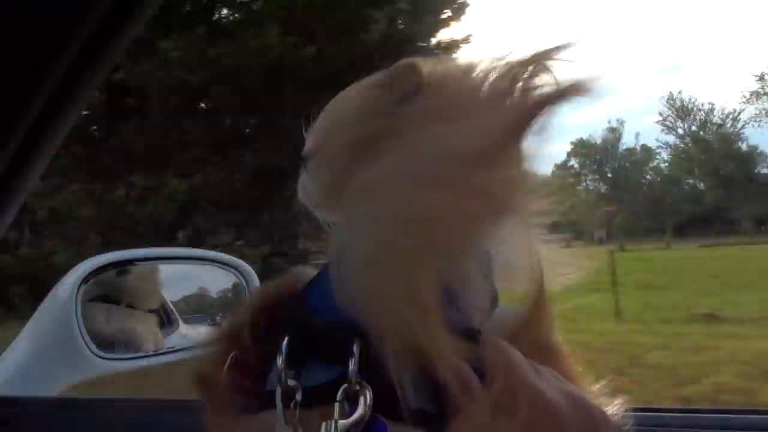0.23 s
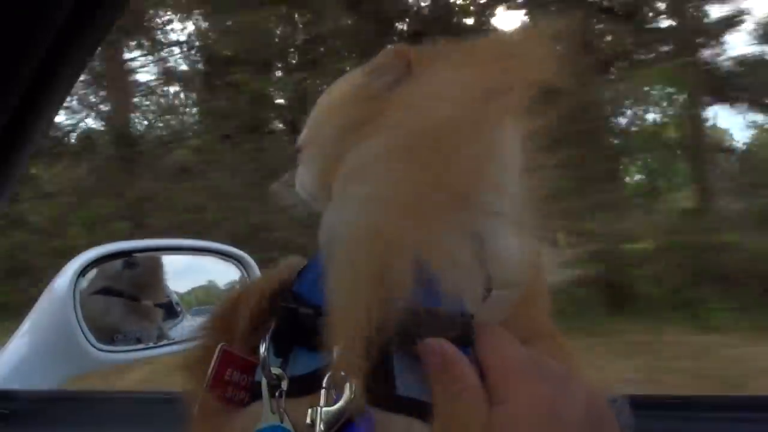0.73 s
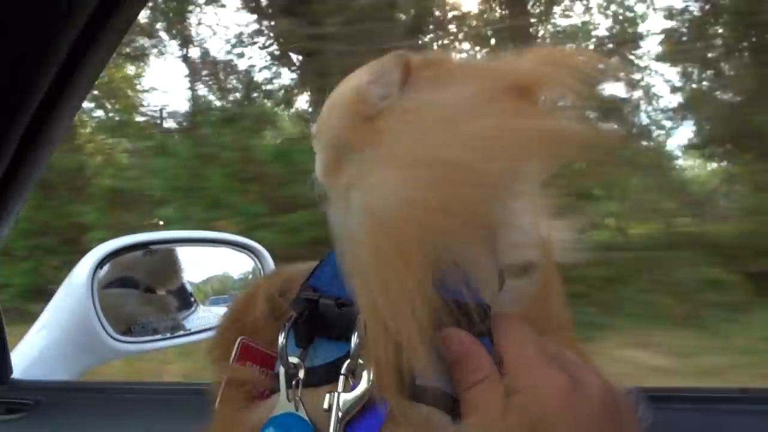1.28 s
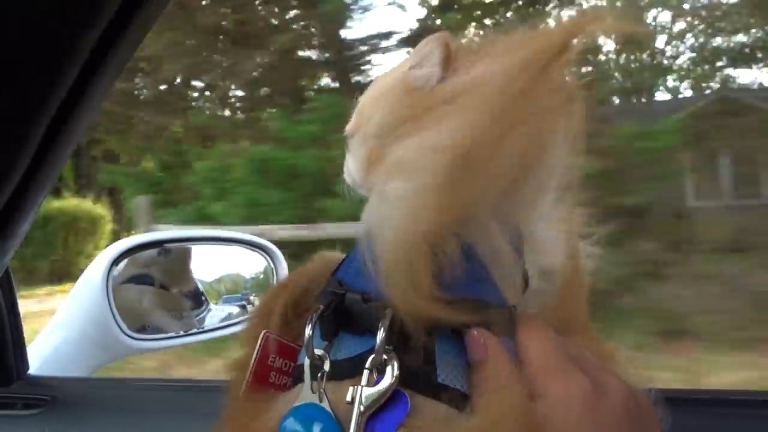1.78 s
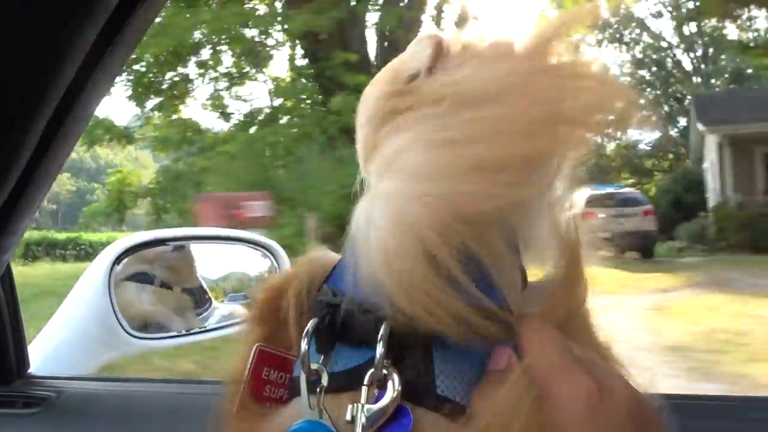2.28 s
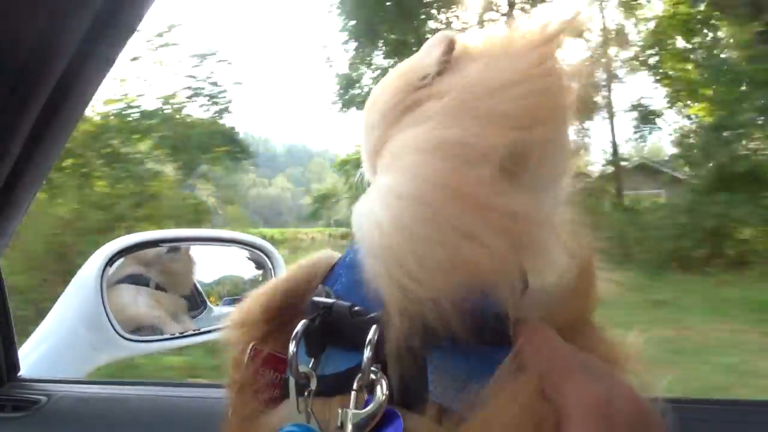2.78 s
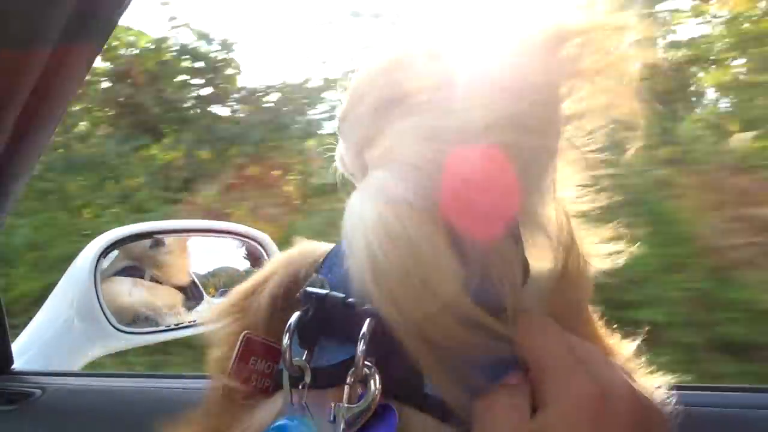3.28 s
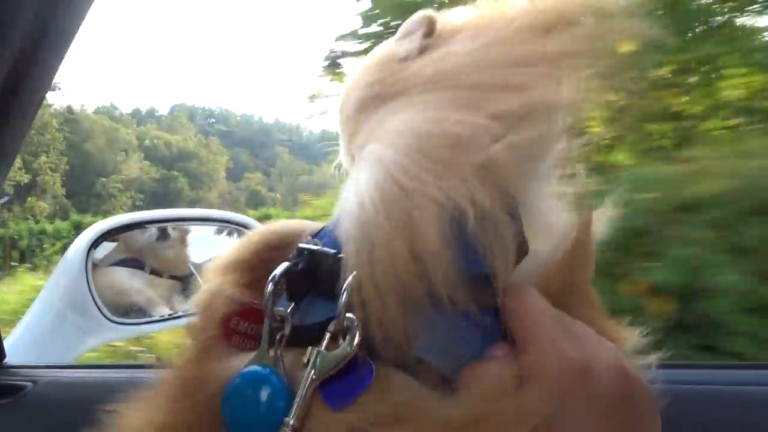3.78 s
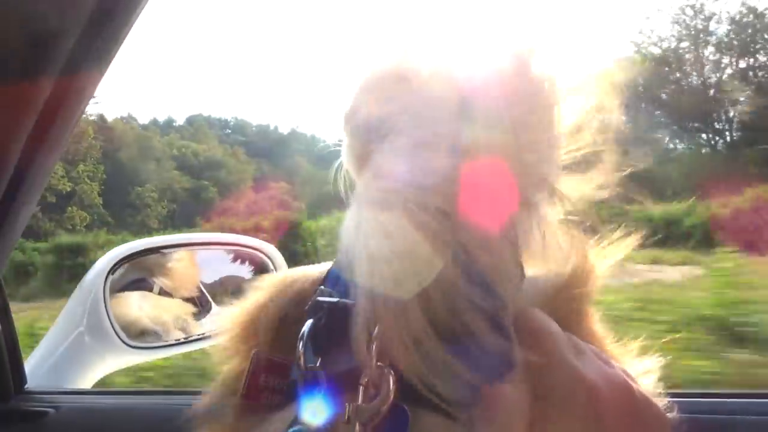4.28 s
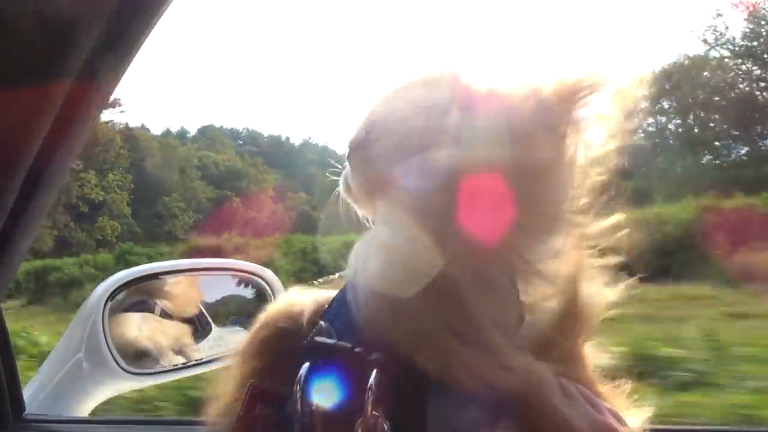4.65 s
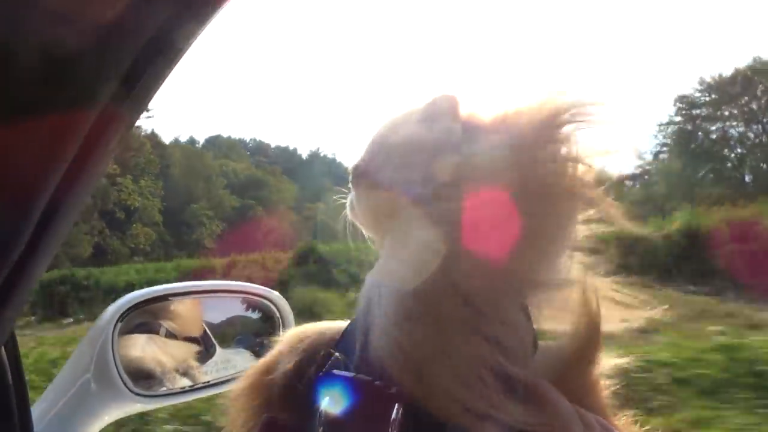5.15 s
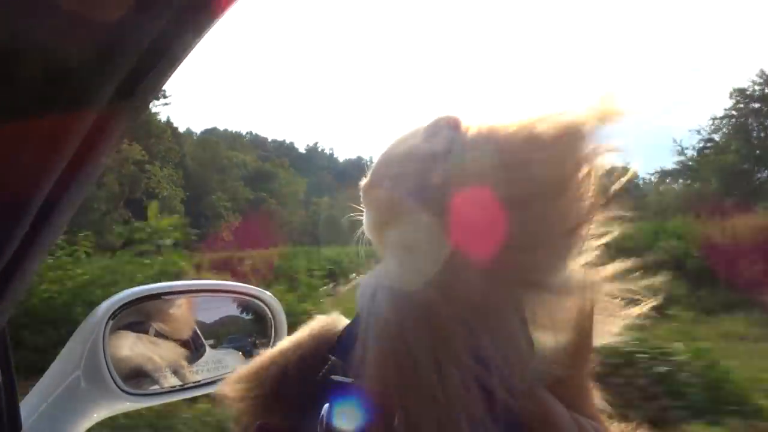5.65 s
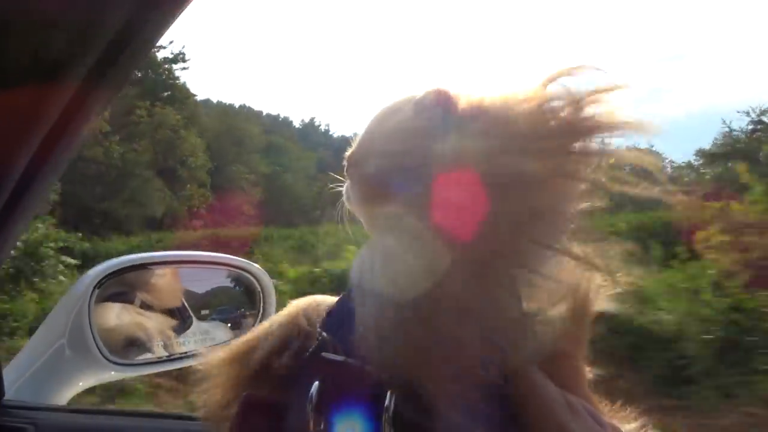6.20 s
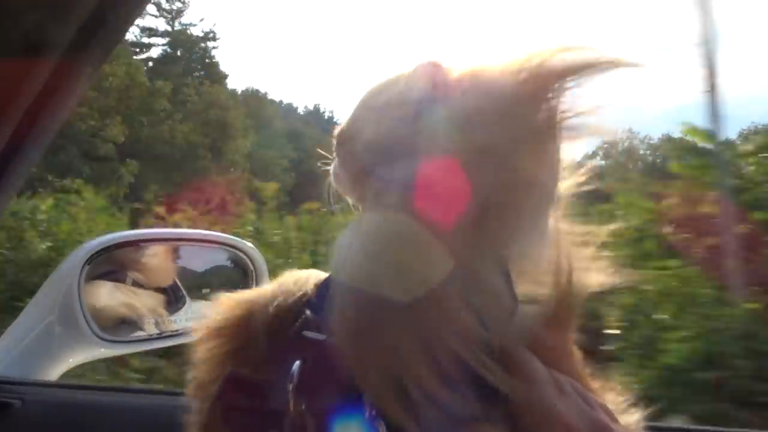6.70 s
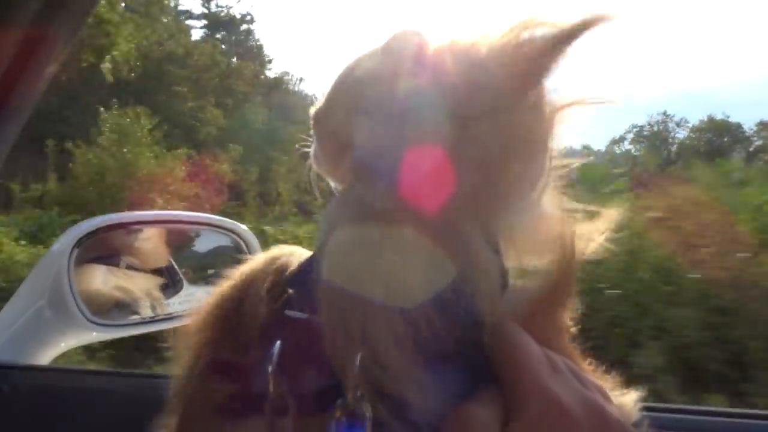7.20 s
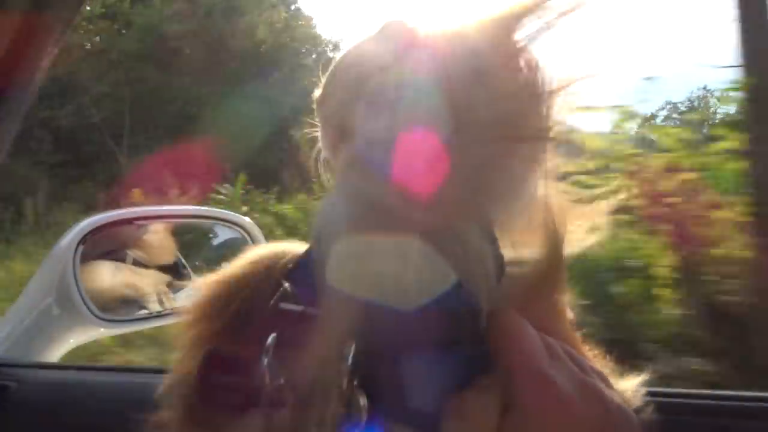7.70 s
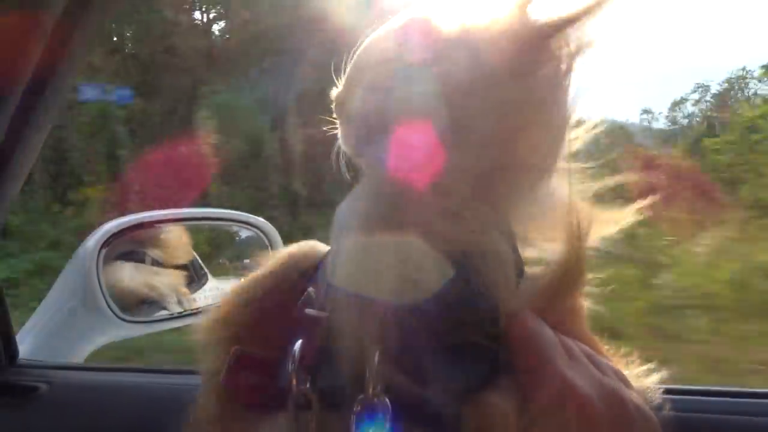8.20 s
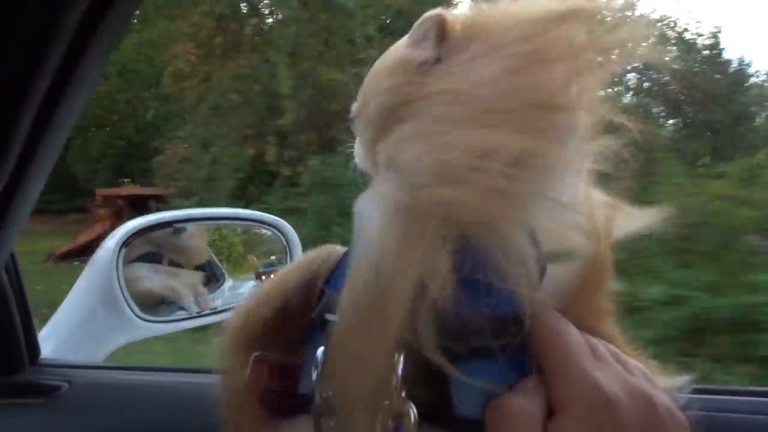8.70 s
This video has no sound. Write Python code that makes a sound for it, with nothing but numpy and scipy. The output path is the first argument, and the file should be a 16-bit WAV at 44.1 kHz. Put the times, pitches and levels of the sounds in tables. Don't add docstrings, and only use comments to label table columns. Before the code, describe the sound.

Close cabin sound beside a long-haired dog at an open car window: buzzing low exhaust, briefly strong, then coasting with soft coughs and dropouts, then firm and steady again, gently climbing. Low wind gusts buffet the left and right microphones, airy hiss swells midway, and strap flicks and small buckle clinks tick through the rough middle section.

```python
import sys
import numpy as np
from scipy import signal
from scipy.fft import rfft, irfft, next_fast_len
from scipy.io import wavfile
from scipy.ndimage import uniform_filter1d, map_coordinates

SR = 44100
rng = np.random.default_rng(int(sys.argv[2]) if len(sys.argv) > 2 else 0)


def store_wav(level_fs):
    pcm = np.round(np.clip(np.atleast_2d(level_fs), -1, 1) * 32767)
    wavfile.write(sys.argv[1], SR, pcm.T.astype(np.int16))


def voltage_ratio(decibels):
    exponent = np.asarray(decibels, float) / 20
    return 10 ** exponent


N = 394254
STEP = 32


def unit(x):
    return x / np.sqrt(np.mean(x ** 2) + 1e-20)


def along(points, hz, axis=1):
    columns = np.transpose(points)
    return np.interp(np.log(hz + 1), np.log(columns[0] + 1), columns[axis])


def curves(rows):
    s, *columns = np.transpose(rows)
    return [np.interp(np.arange(N) / SR, s, column) for column in columns]


def fine(x):
    return np.interp(np.arange(N) / STEP, np.arange(len(x)), x)


def wobble(rate):
    knots = rng.standard_normal(int(N * rate / SR) + 4)
    return fine(map_coordinates(knots, [np.arange(0, N + STEP, STEP) * rate / SR]))


def filtered(x, response):
    m = next_fast_len(N + 8192)
    return irfft(rfft(x, m) * response(np.fft.rfftfreq(m, 1 / SR)), m)[..., :N]


def engine():
    # start_s, firing_hz
    firing = [(0.1, 92.05), (0.3, 92.75), (0.85, 93.1), (1.35, 91.55), (2.33, 88.9), (2.78, 85.8),
              (3.66, 85.6), (3.95, 84.05), (4.12, 84.15), (4.6, 85.3), (4.9, 84.75), (5.35, 85.9),
              (5.6, 86.9), (6.2, 89.8), (6.5, 91.05), (7.1, 92.4), (7.9, 93.45), (8.83, 94.9)]
    # start_s, opening_0_to_1
    throttle = [(0, 0.79), (.92, 0.77), (.97, 0), (4.36, 0.03), (4.46, 1), (8.94, 0.99)]
    # start_s, strength_db
    effort = [(0, 3), (.12, 1.2), (.2, -3), (.3, -6), (.7, -7.5), (.92, -6), (1, -4), (1.8, -1.5),
              (2.1, -0.5), (4.36, 0.5), (4.46, -0.3), (4.56, 0.3), (6.7, 0.4), (6.85, -1.3), (7, -0.03),
              (8.94, 0.5)]
    hz, load, effort_db = *curves(firing), *curves(throttle), *curves(effort)
    lost = stumble()
    unsteady_hz = hz * (1 + 0.003 * wobble(18) + 0.0492 * lost * wobble(30))
    turn = 2 * np.pi * np.cumsum(unsteady_hz) / SR
    drone = firing_orders(turn, hz[::STEP], load[::STEP], effort_db[::STEP], lost)
    drone += voltage_ratio(-37.5 + 0.95 * effort_db) * uneven_cylinders(turn, load)
    return drone + cough(lost), turn


def stumble():
    # start_s, length_s, drop_db
    misfires = [(0.904, 0.014, -4.0), (0.932, 0.04, -9.0), (1.058, 0.022, -5.0), (1.165, 0.026, -7.0),
                (2.363, 0.012, -3.0), (2.458, 0.054, -8.0), (2.568, 0.036, -5.0), (2.674, 0.066, -10.0),
                (2.83, 0.042, -6.0), (2.969, 0.084, -9.0), (3.093, 0.082, -12.0), (3.293, 0.04, -6.0),
                (3.406, 0.072, -11.0), (3.548, 0.038, -7.0), (3.716, 0.018, -5.0), (3.767, 0.01, -3.0),
                (3.847, 0.04, -8.0), (4.003, 0.04, -8.0), (4.169, 0.032, -9.0), (4.298, 0.085, -9.0),
                (4.383, 0.1, -6.0), (4.483, 0.05, -3.0)]
    lost = np.zeros(N)
    for s, length, db in misfires:
        lost[round(s * SR):round((s + length) * SR)] = 1 - voltage_ratio(db)
    return uniform_filter1d(lost, size=640)


def order_levels(hz, load, effort_db):
    revs_hz = (85.1, 85.9, 87.5, 91.5, 95)
    loaded = [(-13, -13, -12.8, -13, -13.5), (-18, -17, -18, -24, -33), (-27.5, -26.5, -28.5, -24.5, -18),
              (-27, -26.5, -26.5, -26, -29.5), (-35.5, -36, -32, -32, -32.5),
              (-41, -31.5, -27.5, -29.5, -29)]
    coasting = (1.55, -6, -8, -8, -12, -17.5)
    follows = (0.85, 0.98, 1, 1.18, 1.8, 0.75)
    upper = (7, 7.5, 9, 10, 12, 13, 16)
    # pitch_hz, width_hz, level_db
    pipe = [(590, 26, -37), (680, 50, -43), (770, 40, -46), (855, 50, -42.5), (1125, 50, -50),
            (1480, 40, -52)]
    closed = np.clip(1 - load / .75, 0, 1)
    levels = []
    for k, (at_revs, coast_db, follow) in enumerate(zip(loaded, coasting, follows), 1):
        levels.append((k, np.interp(hz, revs_hz, at_revs) + coast_db * closed + follow * effort_db))
    for k in upper:
        peaks_db = [db - 10 * np.log10(1 + (2 * (k * hz - c) / w) ** 2) for c, w, db in pipe]
        levels.append((k, np.max(peaks_db, axis=0) - 6 * (k % 1) - 14 * (1 - load)))
    return levels


def firing_orders(turn, hz, load, effort_db, lost):
    # pitch_hz, level_db, lead_rad
    cabin_left = [(90, -1.6, 0), (165, -4, -.1), (178, -7, -.7), (190, -14, -2), (255, -6, .4),
                  (280, -4.5, .7), (345, -6, 0), (375, -9, -.2), (460, -8, .5), (520, -2, 0),
                  (565, -4, -.1), (690, 0, -.2), (850, 2, -.4), (1100, 1, -1.2)]
    out = np.zeros((2, N))
    for k, db in order_levels(hz, load, effort_db):
        flutter_db = (0.3 + .3 * np.sqrt(k - 1)) * (2.1 - 1.7 * load) * wobble(22)[::STEP]
        shift = 0.5 * (1 - k) + (k == 2) * np.pi * (.66 - 1.14 * load)
        left = voltage_ratio(along(cabin_left, k * hz)) * np.exp(1j * along(cabin_left, k * hz, axis=2))
        notch_db = -9 * load / (1 + (2 * (k * hz - 353) / 8) ** 2)
        size = voltage_ratio(db + flutter_db + notch_db) * np.exp(1j * shift)
        size = size * np.sqrt(8) / np.abs(1 + left)
        ports = np.array([fine(size * left), fine(size)])
        out += np.real(ports * np.exp(1j * k * turn)) * (1 - lost / k)
    return out


def uneven_cylinders(turn, load):
    # order, level_db, change_under_load_db
    halves = [(.5, 1, -2), (1.5, -1, -3.5), (2.5, -5, 3), (3.5, -7, 5), (4.5, -7.5, 2.5), (5.5, -14.5, 7.5)]
    growl = np.zeros(N)
    for k, db, load_db in halves:
        growl += voltage_ratio(db + load_db * load + 2.8 * wobble(7)) * np.cos(k * turn)
    return growl


def cough(lost):
    # pitch_hz, level_db
    spectrum = [(20, -37.5), (55, 15.5), (72, -5.5), (100, -19), (130, 5), (260, -8), (400, -9.5),
                (700, -37), (1200, -120)]
    noise = filtered(rng.standard_normal(N), lambda f: voltage_ratio(along(spectrum, f)))
    return voltage_ratio(-16.5) * lost * unit(noise)


def crosswind():
    peak_s, half_s = 3.46, 2
    return np.exp(-((np.arange(N) / SR - peak_s) / half_s) ** 2)


def gusts():
    # centre_s, length_s, level_db
    puffs = [(0.106, 0.023, -11.5), (0.143, 0.054, -12), (0.647, 0.052, -19), (0.739, 0.016, -11.5),
             (1.009, 0.047, -13), (1.057, 0.03, -6), (1.105, 0.023, -13), (1.148, 0.0079, -13),
             (1.46, 0.023, -20), (1.588, 0.042, -8), (1.616, 0.015, -7.5), (2.523, 0.08, -16.5),
             (2.295, 0.022, -17), (2.357, 0.069, -12.5), (2.402, 0.018, -11), (2.648, 0.029, -20),
             (2.709, 0.053, -6.5), (2.747, 0.022, -11), (2.834, 0.032, -18), (3.315, 0.05, -8),
             (3.364, 0.064, -12.5), (3.417, 0.027, -12), (4.046, 0.029, -15.5), (4.112, 0.04, -9.5),
             (4.211, 0.017, -19), (4.597, 0.06, -16.5), (4.64, 0.015, -18), (5.105, 0.082, -11.5),
             (5.775, 0.023, -14), (7.87, 0.071, -19)]
    # pitch_hz, level_db
    spectrum = [(20, -41.5), (50, -20), (100, -1.5), (220, -2.5), (350, -8.5), (550, -19.5), (1000, -35),
                (1600, -64.5), (3000, -120)]
    t = np.arange(N) / SR
    size = voltage_ratio(-38.5 + 6 * crosswind() + 2.9 * wobble(45))
    for s, length, db in puffs:
        near = slice(max(round((s - .1) * SR), 0), round((s + .1) * SR))
        size[near] += voltage_ratio(db - 3.0) * np.exp(-((t[near] - s) / (0.36 * length)) ** 2)

    def buffeting():
        lumpy = voltage_ratio(2.7 * wobble(90)) * rng.standard_normal(N)
        return unit(filtered(lumpy, lambda f: voltage_ratio(along(spectrum, f))))

    across, common = buffeting(), buffeting()
    return size * np.array([.92 * across + .24 * common, -across + .24 * common])


def harness():
    # start_s, peak_db
    ticks = [(1.39, -53), (1.5239, -53), (2.134, -50), (2.37, -51.5), (2.7684, -44), (2.84, -49),
             (2.917, -45.5), (3.4194, -50.5), (3.57, -45), (3.586, -49.5), (3.607, -44), (3.639, -46),
             (3.694, -47), (3.769, -46.5), (3.947, -53.5), (4.134, -52.5), (4.226, -40.5), (4.322, -48.5),
             (4.479, -55), (4.61, -52)]
    # start_s, peak_db, pitch_hz
    clinks = [
        (3.47, -19.5, 2800),
        (4.2893, -24.5, 2600),
        (4.33, -24, 1490),
    ]
    out, t = np.zeros((2, N + SR)), np.arange(SR // 25) / SR
    burst = np.clip(t / .0012, 0, 1) * np.exp(-(t / 0.012) ** 2)
    for s, db in ticks:
        out[:, round(s * SR):][:, :len(t)] += voltage_ratio(db - 1.0) * burst * rng.standard_normal((2, len(t)))
    bright = [(1500, -50), (2500, -4.5), (4000, 12), (9000, 3.5), (15500, -6)]  # Hz, dB
    out = filtered(out[:, :N], lambda f: voltage_ratio(along(bright, f)))
    for s, db, hz in clinks:
        ring = np.zeros(len(t))
        for ratio, level in [(1, 1), (1.5, .3), (1.77, .5), (.5, .5)]:
            ring += level * np.sin(2 * np.pi * ratio * hz * t)
        decay = voltage_ratio(db + 7 - 60 * t / 0.005)
        out[:, round(s * SR):][:, :len(t)] += decay * np.clip(t / 0.0008, 0, 1) * ring
    return out


def whistles():
    # centre_s, half_length_s, pitch_hz, width_hz, level_db
    edges = [
        (3.45, .4, 8100, 450, -60),
        (7.9, .25, 2900, 500, -45),
        (7.9, 1.1, 2150, 90, -48),
        (1.7, .9, 6500, 200, -61),
        (4.55, .2, 700, 500, -39),
        (2.6, .28, 14500, 1300, -62),
        (.06, .1, 13000, 3000, -70),
    ]
    t, out = np.arange(N) / SR, np.zeros((2, N))
    for s, half, hz, width, db in edges:
        noise = rng.standard_normal((3, N))
        band = filtered(noise[:2] + noise[2], lambda f: np.exp(-((f - hz) / width) ** 2))
        out += voltage_ratio(db) * np.exp(-((t - s) / half) ** 2) * unit(band)
    return out


def rush(spectrum, patchy_db):
    # pitch_hz, width_hz, lift_db
    housing = [(933, 98, 3.5), (1093, 33, 5), (2139, 110, 6), (4034, 49, 7), (5880, 480, 4.5),
               (6560, 220, 9), (7720, 360, 3.5)]
    # pitch_hz, likeness_0_to_1, left_lead_rad, left_over_right_db
    alike = [(25, 0.8, 1, -2), (60, 0.4, -0.5, -1), (129, 0.1, 0, 1.5), (298, 0.6, 0, -2),
             (790, 0.8, 0.25, -0.5), (1400, 0.7, 0.3, 1.5), (2700, 0.6, 0.6, 1), (4120, 0.4, 1.42, 0.3),
             (5600, 0.09, 2.5, 0), (7000, 0.12, 3, -0.5), (11500, 0, 7.5, 1), (14000, .5, 6.5, -1.5)]
    z = signal.stft(rng.standard_normal((2, N)), nperseg=512)[2]
    field = uniform_filter1d(rng.standard_normal(z.shape[1:]), size=6, axis=0)
    field = uniform_filter1d(field, size=12, axis=1)
    pair = signal.istft(z * voltage_ratio(patchy_db * unit(field)), nperseg=512)[1][:, :N]

    def mid_side(hz):
        turn = np.arccos(np.clip(along(alike, hz), -1, 1)) / 2
        lift_db = sum(db / (1 + (2 * (hz - c) / w) ** 2) for c, w, db in housing)
        return voltage_ratio(along(spectrum, hz) + lift_db) * np.array([np.cos(turn), np.sin(turn)])

    def apart(hz):
        left = voltage_ratio(along(alike, hz, axis=3) / 2) * np.exp(.5j * along(alike, hz, axis=2))
        return np.array([left, 1 / left])

    mid, side = filtered(pair, mid_side)
    return unit(filtered(np.array([mid + side, mid - side]), apart))


def cabin(turn):
    # start_s, level_db
    wind = [(0, -68.5), (.05, -65), (.3, -74), (.8, -66.5), (1.3, -65), (1.8, -60.5), (2.7, -60.5),
            (3.3, -60.5), (3.6, -59.5), (3.9, -61.5), (5.1, -62.5), (5.4, -68), (6.3, -62), (6.65, -61.5),
            (6.9, -66), (7.2, -61.5), (7.75, -57), (8.94, -60.5)]
    # level_db, db_per_airflow_db, crosswind_db
    layers = [
        (-36.5, -0.2, 4),
        (-29.5, 0.08, 2.1),
        (-34.5, 0.28, 1.14),
        (-44, .5, 0.5),
        (-62.5, 0.85, 0.5),
        (-79.5, 1.4, 13),
    ]
    # pitch_hz, level_db
    shake = [(10, -6), (25, -2.5), (55, -2.5), (70, -5.5), (100, -78.5), (200, -120)]
    boom = [(50, -43), (70, 0.5), (130, 1), (250, -2), (420, -6.5), (600, -16), (800, -51), (1500, -120)]
    road = [(320, -26), (550, -5.5), (678, -4.5), (916, -4), (994, -6.5), (1120, -5.5), (1370, -9),
            (2200, -14), (2370, -15), (3300, -29.5), (4290, -44), (7260, -120)]
    air = [(1650, -36.5), (2800, 1), (3640, -1.5), (4020, 1.5), (5130, -7), (6610, -11), (7160, -10.5),
           (7760, -11.5), (8600, -30), (11200, -48.5), (18900, -120)]
    fizz = [(6000, -50.5), (8200, 0), (9600, 1), (10500, -3), (12000, -6.5), (13500, -14.5), (16000, -39)]
    top_fizz = [(9000, -50), (12000, -12), (13500, -5), (14700, 0), (15700, -1), (17000, -60)]
    flow_db = curves(wind)[0] + 62
    side = crosswind()
    levels = [db + grows * flow_db + side_db * side for db, grows, side_db in layers]
    shake_db, boom_db, road_db, air_db, fizz_db, top_db = levels
    swell = .35 * wobble(6)
    out = voltage_ratio(shake_db) * rush(shake, patchy_db=0.0)
    out += voltage_ratio(boom_db + 1.1 * wobble(17)) * rush(boom, patchy_db=1.4)
    out += voltage_ratio(road_db + swell) * (1 + 0.05 * np.cos(turn)) * rush(road, patchy_db=0.55)
    out += voltage_ratio(air_db + swell) * rush(air, patchy_db=1.05)
    hiss = voltage_ratio(fizz_db) * rush(fizz, patchy_db=.8) + voltage_ratio(top_db) * rush(top_fizz, patchy_db=.8)
    return out + voltage_ratio(.9 * wobble(60)) * hiss


def scene():
    drone, turn = engine()
    return drone + gusts() + harness() + whistles() + cabin(turn)


def roll_off(x):
    return signal.sosfilt(signal.butter(12, 15780, fs=SR, output="sos"), x)


def record(dry):
    faded = dry * np.clip(np.arange(N, 0, -1) / 130, 0, 1)
    mix = faded / (1 + np.abs(faded / 0.8) ** 12) ** (1 / 12)
    return roll_off(mix)


dry = scene()
out = record(dry)
store_wav(out)
```